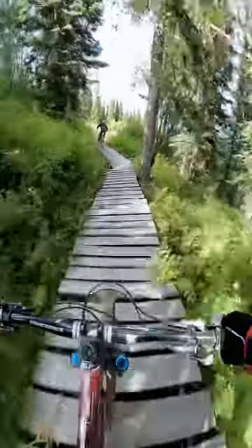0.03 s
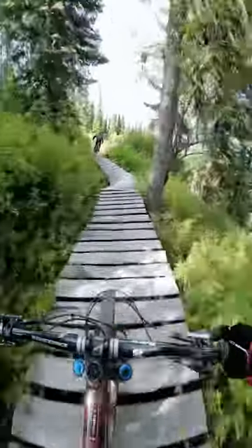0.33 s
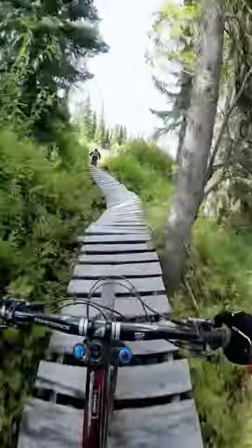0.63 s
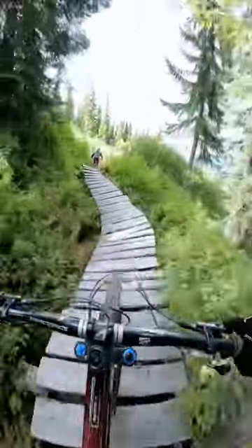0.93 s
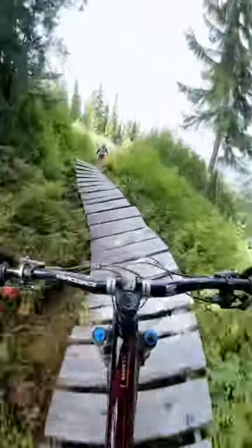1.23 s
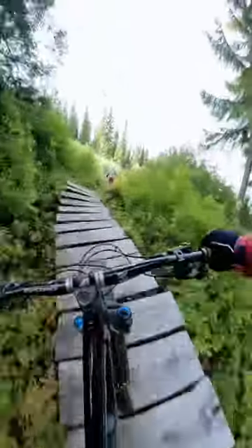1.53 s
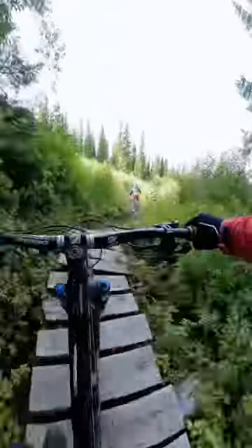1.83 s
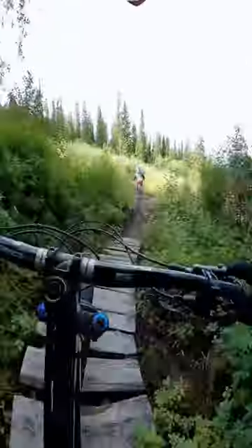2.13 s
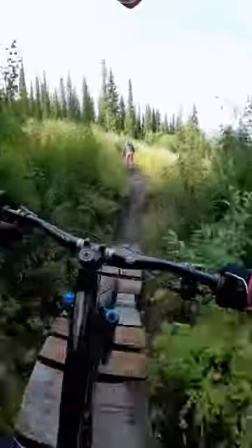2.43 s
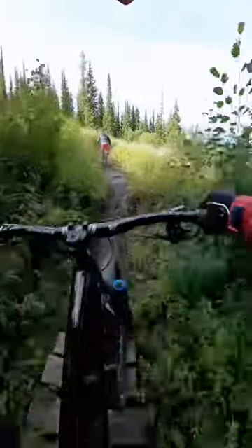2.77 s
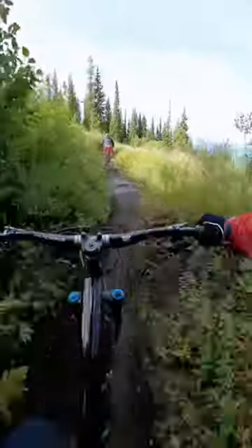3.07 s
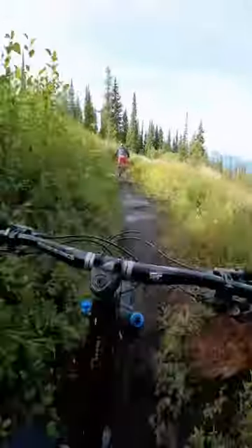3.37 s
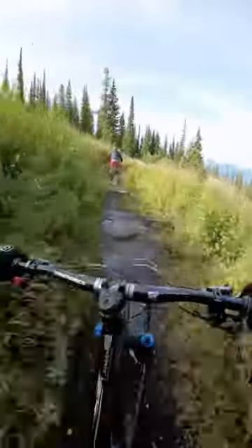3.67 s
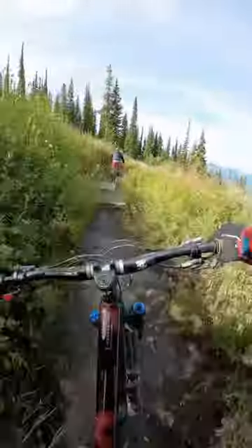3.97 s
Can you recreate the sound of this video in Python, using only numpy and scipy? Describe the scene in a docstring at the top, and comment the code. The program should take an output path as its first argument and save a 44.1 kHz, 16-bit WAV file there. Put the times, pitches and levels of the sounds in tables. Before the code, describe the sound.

A mountain bike drums over a hollow wooden boardwalk, thudding and clacking, then drops onto a dirt trail where the tyres hum and crunch. Gusting wind buffets the microphone on the rider's chest throughout.

```python
"""A mountain bike, heard from the rider's chest, with wind buffeting the microphone and rushing past in gusts.
First the tyres drum over a hollow plank boardwalk; bumps thud and loose parts clack against the frame.
At 1.9 s the bike drops off the end, the freewheel's whirr swells and the rumble dips briefly.
From 2.3 s the tyres hum, crunch and hiss over a dirt trail, and the running gear gives a few short
metallic scrapes, the loudest just after 3.2 s."""
import sys
import numpy as np
from scipy import signal
from scipy.fft import rfft, irfft
from scipy.io import wavfile
from scipy.ndimage import uniform_filter1d

SR = 44100
rng = np.random.default_rng(int(sys.argv[2]) if len(sys.argv) > 2 else 0)


def put_to_file(sound):
    """Save the sound as 16-bit audio at rate SR, in the file named by the first command-line argument."""
    columns = np.atleast_2d(sound).T  # one column per channel
    safe = np.clip(columns, -1, 1)
    whole_steps = np.round(safe * 32767)
    wavfile.write(sys.argv[1], SR, whole_steps.astype(np.int16))


N = 176400
BOARDWALK_END_S = 1.9


def undb(db):
    """Decibels to gain."""
    return 10 ** (np.asarray(db) / 20)


def unit(x):
    """Scale to rms 1."""
    return x / np.sqrt(np.mean(x ** 2) + 1e-20)


def curve(rows, column=1):
    """An envelope: one column of a table, joined by straight lines in time."""
    rows = np.array(rows, float)
    return np.interp(np.arange(N) / SR, rows[:, 0], rows[:, column])


def colour(x, points):
    """Equalise a sound through points of freq_hz, gain_db, then scale to rms 1."""
    hz, db = np.array(points, float).T
    freqs = np.maximum(np.fft.rfftfreq(N, 1 / SR), 1)
    gain = undb(np.interp(np.log(freqs), np.log(hz), db))
    return unit(irfft(rfft(x) * gain, N))


def ring(x, hz, width_hz):
    """One resonance, gain 1 at its centre."""
    return signal.lfilter(*signal.iirpeak(min(hz, .45 * SR), hz / width_hz, fs=SR), x)


def lowpass(x, hz):
    """Fourth-order low-pass."""
    return signal.sosfilt(signal.butter(4, min(hz, .45 * SR), fs=SR, output="sos"), x)


def noise():
    """White noise."""
    return rng.standard_normal(N)


def wander(rate_hz):
    """Smooth random modulation up to about the given rate, rms 1."""
    rolloff = np.exp(-(np.fft.rfftfreq(N, 1 / SR) / rate_hz) ** 2)
    return unit(irfft(rfft(noise()) * rolloff, N))


def steady(x, span_s):
    """Level out swells slower than the span, holding the rms near 1."""
    return x / np.sqrt(uniform_filter1d(x ** 2, max(int(span_s * SR), 2)) + 1e-12)


def burst(x, start_s, level_db, decay_s, attack_s=0.0072):
    """Shape a sound into a hit with a fast attack and exponential decay; the level is that of its crest."""
    age = np.maximum(np.arange(N) / SR - start_s, 0)
    fall = np.exp(-np.minimum(np.maximum(age - attack_s, 0) / decay_s, 20))
    envelope = np.minimum(age / attack_s, 1) * fall
    return unit(x * envelope) * np.sqrt(np.mean(envelope ** 2)) * undb(level_db)


def rough_hum(rows, width_hz, wobble=0.02965, rasp=0.31):
    """A gliding tone and raspy overtone, unsteady in level and phase; rows: time_s, pitch_hz, level_db."""
    pitch_hz = curve(rows) * (1 + wobble * wander(14.98))
    phase = 2 * np.pi * np.cumsum(pitch_hz) / SR
    tone = wander(width_hz) * np.cos(phase) + wander(width_hz) * np.sin(phase)
    overtone = wander(2 * width_hz) * np.cos(1.7 * phase) + wander(2 * width_hz) * np.sin(1.7 * phase)
    return (steady(tone, 0.047) + rasp * steady(overtone, 0.092)) * undb(curve(rows, column=2))


def freewheel(ticks_per_s=160, blur=0.58, scatter_db=2.5, coast_db=-49.5, coast_s=1.9):
    """The ratchet's fast ticks blur into a ringing whirr that swells as the bike coasts."""
    # ratchet resonances: centre_hz, width_hz, gain_db
    hub_modes = [(2125, 190, 2.5), (2750, 76, 5.5), (3880, 205, 2)]
    tick_phase = np.cumsum(ticks_per_s * (1 + 0.029 * wander(3.7))) / SR % 1
    ticks = noise() * np.exp(-tick_phase / blur) * undb(scatter_db * wander(27))
    whirr = sum(undb(db) * ring(ring(ticks, hz, width), hz, 3 * width) for hz, width, db in hub_modes)
    swell = np.interp(np.arange(N) / SR, [coast_s - .2, coast_s + .39], [.5, 1])
    return unit(lowpass(whirr, 4440)) * undb(coast_db) * swell


def tyre_hiss(grain_db=2):
    """Fine grit hisses under the tyres."""
    # bright tone of the grit: freq_hz, gain_db
    hiss_eq = [(1500, -2), (3000, 7.5), (4700, 4.5), (6000, .5), (8700, -2), (9600, -7.5), (11200, -16)]
    # swell of the hiss: time_s, level_db
    hiss_levels = [(0, -49.5), (1.45, -54), (1.7, -49), (2.1, -57), (2.5, -53.5), (2.8, -47), (3.25, -42.5),
                   (3.45, -48), (4, -49.5)]
    grit = noise() * undb(grain_db * wander(560))
    return colour(grit, hiss_eq) * undb(curve(hiss_levels))


def scrapes(rasp_db=-8):
    """Chain and brakes scrape now and then: a narrow metallic ring over a grainy rasp."""
    # metal rubbing metal: start_s, level_db, centre_hz, decay_s
    rubs = [(1.03, -54, 8150, 0.059), (2.289, -44.5, 5800, .014), (3.172, -39.5, 4660, 0.027),
            (3.235, -31, 4020, 0.03), (3.342, -41.5, 4970, 0.049)]
    out = 0
    for start, db, hz, decay in rubs:
        metal = unit(ring(ring(noise(), hz, 0.16 * hz), hz, 0.48 * hz))
        rasp = unit(lowpass(ring(noise(), hz, 1.3 * hz), 7700)) * undb(rasp_db + 4.6 * wander(300))
        out += burst(metal + rasp, start, db, decay)
    return out


def gravel(stones_per_s=86, decay_s=0.0042, scatter_db=6):
    """Small stones crunch under the knobs, each a tiny crack of its own size."""
    # crunch of loose stones: time_s, level_db
    crunch_levels = [(2.3, -47), (2.67, -48), (2.7, -43), (3.25, -41.5), (3.34, -54)]
    stones = (rng.random(N) < stones_per_s / SR) * undb(scatter_db * rng.uniform(-0.5, 1, N))
    cracks = signal.lfilter([1], [1, -np.exp(-1 / (decay_s * SR))], stones) * noise()
    crunch = lowpass(ring(cracks, hz=1480, width_hz=1400), 4800)
    return steady(crunch, 0.08) * undb(curve(crunch_levels))


def clacks(chatter_db=3.5, detune=0.13, crack_db=-1):
    """Loose parts chatter against the frame: a crack and a short ring, a little different at each knock."""
    # knocks on the frame: start_s, level_db, centre_hz, decay_s
    knocks = [(0.321, -28, 2140, .009), (.367, -30, 3000, 0.0087), (0.485, -30.5, 2900, 0.033),
              (1.244, -28.5, 1480, 0.012), (1.32, -33.5, 2700, 0.029), (1.406, -30, 2690, 0.012),
              (1.558, -22.5, 1530, 0.014), (1.722, -31.5, 2920, .018), (2.3, -36.5, 2800, 0.012),
              (2.695, -29, 1680, .007), (2.893, -27, 1500, 0.0062), (3.173, -22.5, 1210, .014),
              (3.236, -29, 1210, .018)]
    # frame resonances: centre_hz
    frame_modes = [990, 1730, 2016, 2470, 3385]
    contact = noise() * undb(chatter_db * wander(700))
    tunings = 1 + detune * rng.uniform(-1, 1, (len(knocks), len(frame_modes)))
    out = 0
    for (start, db, centre, decay), tuning in zip(knocks, tunings):
        frame = sum(ring(contact, hz, width_hz=190) for hz in tuning * frame_modes)
        body = unit(ring(frame, centre, centre))
        crack = unit(lowpass(ring(contact, centre, centre), 2 * centre))
        out += burst(body + undb(crack_db) * crack, start, db, decay, attack_s=0.0023)
    return lowpass(out, 4800)


def tread():
    """Knobs slap the dirt in a rough hum that follows speed; the casing drones where pressed hardest."""
    # tread knobs on firm dirt: time_s, pitch_hz, level_db
    knob_hum = [(2.3, 235, -49), (2.66, 255, -26.5), (2.8, 280, -31), (2.94, 320, -22.5), (3.2, 298, -29),
                (3.33, 294, -41.5), (4, 260, -39.5)]
    # tyre casing pressed into a dip: time_s, pitch_hz, level_db
    casing_drone = [(2.6, 481.2, -51), (2.99, 547.7, -30.5), (3.05, 680, -26.5), (3.18, 593.4, -26),
                    (3.4, 621, -46.5)]
    return rough_hum(knob_hum, width_hz=62) + rough_hum(casing_drone, width_hz=100)


def wind(load, lumps_db=1.27, flutter_db=2.22, tear_db=0.36, eddy_db=0.05, jolt=0.94):
    """Eddies push on the microphone; the rush of air flutters with them and with the plank jolts."""
    # bass-heavy tone of the eddies: freq_hz, gain_db
    buffet_eq = [(10, -13.5), (25, -2), (45, -0.5), (110, -7), (170, -14), (300, -53), (800, -73.5)]
    # wind pressing on the microphone: time_s, level_db
    buffet_levels = [(0, -26), (.42, -27.5), (.53, -16.5), (.66, -25.5), (.94, -30), (1.05, -20),
                     (1.3, -20.5), (1.68, -21.5), (1.81, -29.5), (1.98, -19.5), (2.23, -32), (2.5, -29),
                     (2.82, -23), (2.98, -22.5), (3.06, -34), (3.22, -17), (3.35, -28.5), (3.5, -18.5),
                     (3.63, -29), (3.77, -24), (4, -33)]
    # midrange tone of the airstream: freq_hz, gain_db
    rush_eq = [(200, -54), (500, 3), (900, -2), (1400, -2.5), (3900, -12.5), (5000, -23.5), (6500, -32),
               (11000, -45)]
    # gusts in the airstream: time_s, level_db
    gust_levels = [(0, -29.5), (.25, -34.5), (.6, -33.5), (1.03, -40), (1.3, -32.5), (1.62, -31),
                   (2.02, -39), (2.2, -49), (2.75, -33), (3.22, -36), (3.36, -41), (3.55, -40), (3.65, -47),
                   (3.8, -39.5), (4, -46)]
    eddies = steady(colour(noise(), buffet_eq), 0.081) * undb(lumps_db * wander(20))
    flutter = undb(flutter_db * wander(37) + tear_db * wander(210) + eddy_db * eddies) * load ** jolt
    rush = steady(colour(noise(), rush_eq) * flutter, 0.13)
    return eddies * undb(curve(buffet_levels)) + rush * undb(curve(gust_levels))


def tyre_load(planks_per_s=22, depth=0.34, decay_s=0.033, jitter=0.11, scatter_db=3):
    """The load on the tyres as a gain near 1: a rounded jolt at each plank edge, smooth on the dirt."""
    t = np.arange(N) / SR
    load = np.ones(N)
    for plank, (late, size) in enumerate(rng.uniform(-1, 1, (100, 2))):
        start = (plank + jitter * late) / planks_per_s
        if 0 < start < BOARDWALK_END_S:
            i = int(start * SR)
            load[i:] += depth * undb(scatter_db * size) * np.exp(-np.minimum(t[:N - i] / decay_s, 20))
    rounded = uniform_filter1d(uniform_filter1d(load, size=130), size=130)
    return steady(rounded, 0.21)


def rumble(load, rough_db=2.47, board_hz=417.5, board_db=-7):
    """The tyres drum on the ground and ring the planks' hollow note until the boardwalk ends."""
    # dull tone of the shaking bike: freq_hz, gain_db
    shake_eq = [(50, -18), (110, -5.5), (260, -1), (450, -7), (850, -18.5), (1500, -34), (4000, -73)]
    # how hard the ground shakes the bike: time_s, level_db
    shake_levels = [(0, -23), (.55, -24.5), (.9, -28), (1.19, -26), (1.4, -20), (1.78, -23.5),
                    (1.93, -19.5), (2.22, -35.5), (2.32, -30), (2.48, -30), (2.72, -23), (3.2, -27),
                    (3.65, -40.5), (3.8, -31.5), (4, -38.5)]
    drive = load * undb(curve(shake_levels))
    roll = steady(colour(noise(), shake_eq) * undb(rough_db * wander(60)), 0.077) * drive
    boards = unit(ring(noise(), board_hz, width_hz=80)) * drive * undb(board_db)
    on_boardwalk = np.clip((BOARDWALK_END_S - np.arange(N) / SR) / 0.14, 0, 1)
    return roll + lowpass(boards, 1.34 * board_hz) * on_boardwalk


def thuds(top_ratio=1.96):
    """Each larger bump is a few damped swings in a dull clutter; the soft tyres muffle its top."""
    # bumps through the bike: start_s, level_db, centre_hz, decay_s
    bumps = [(.139, -14.5, 239, 0.047), (0.313, -15, 268.4, 0.033), (.375, -15.5, 330, 0.0053),
             (.56, -14, 462, 0.0046), (.749, -23, 320, 0.0061), (.929, -22, 267, 0.011),
             (1.033, -10.5, 209, 0.014), (1.101, -14, 322, 0.0084), (1.472, -20.5, 358, 0.0098),
             (1.579, -16.5, 289, 0.017), (1.862, -12, 236.5, 0.036), (1.955, -15.5, 455, 0.018),
             (3.175, -17, 510, 0.0075), (3.825, -16, 259.5, .0081)]
    t = np.arange(N) / SR
    out = 0
    for start, db, hz, decay in bumps:
        clutter = steady(ring(ring(noise(), hz, hz), hz, 1.4 * hz), 0.012)
        swing = np.sin(2 * np.pi * hz * (t - start))
        out += lowpass(burst(swing + clutter, start, db, decay), top_ratio * hz)
    return out


def scene():
    """Wind and bike in mono; the same plank jolts pulse through the airstream and the rumble."""
    load = tyre_load()
    foreground = wind(load) + rumble(load) + thuds() + clacks() + tread()
    texture = gravel() + tyre_hiss() + freewheel() + scrapes()
    return (foreground + texture)[None]


def record(dry, top_hz=11400):
    """A steep low-pass takes off the highest treble."""
    return signal.sosfilt(signal.ellip(8, .2, 70, top_hz, fs=SR, output="sos"), dry)


dry = scene()
out = record(dry)
put_to_file(out)
```